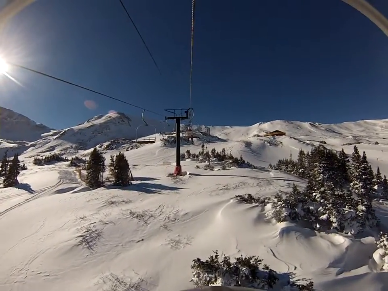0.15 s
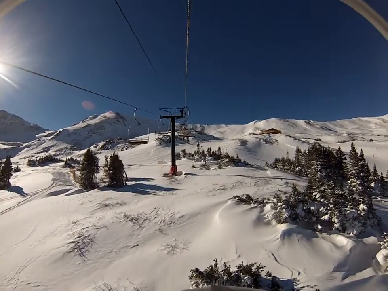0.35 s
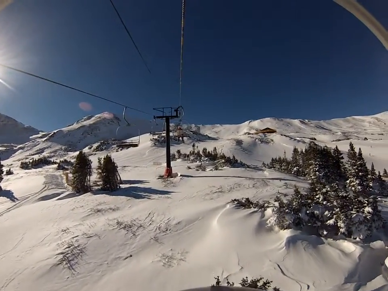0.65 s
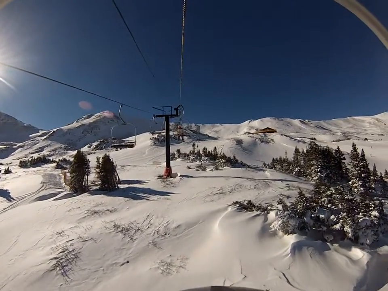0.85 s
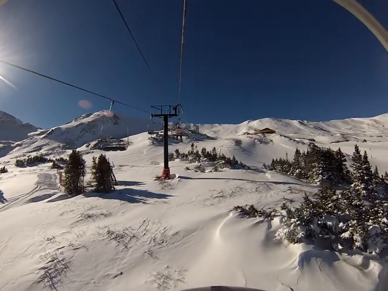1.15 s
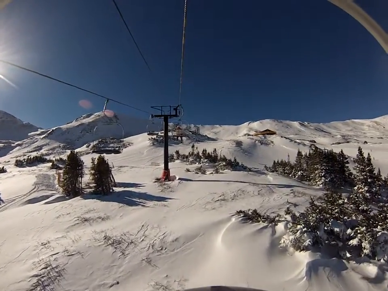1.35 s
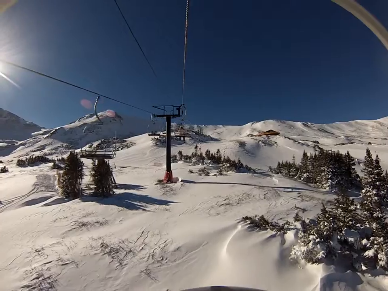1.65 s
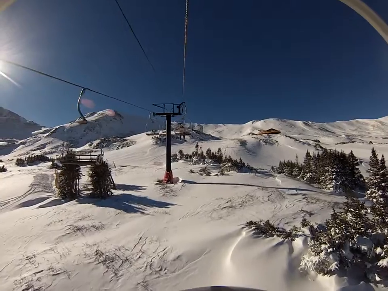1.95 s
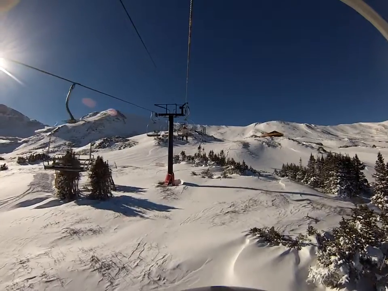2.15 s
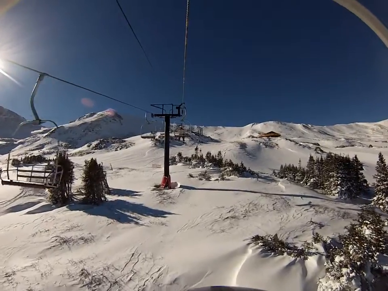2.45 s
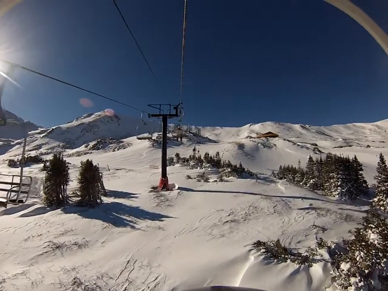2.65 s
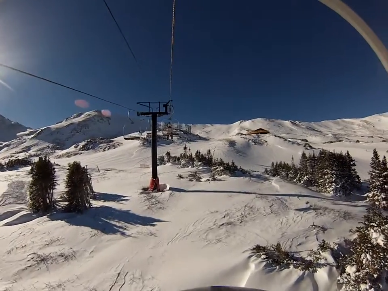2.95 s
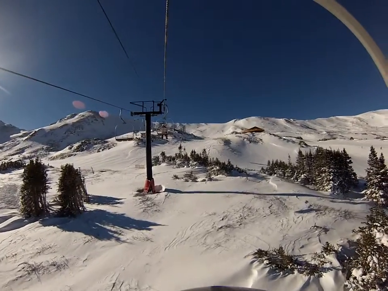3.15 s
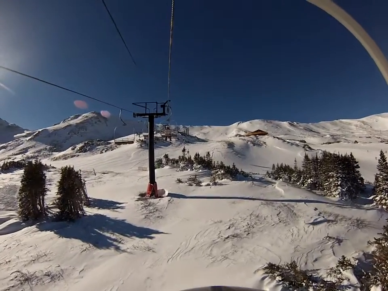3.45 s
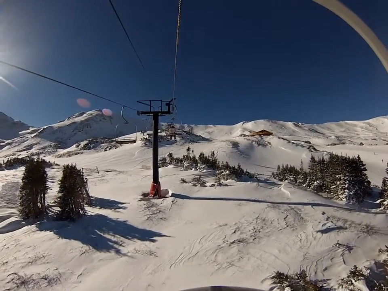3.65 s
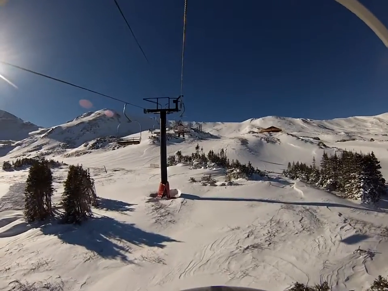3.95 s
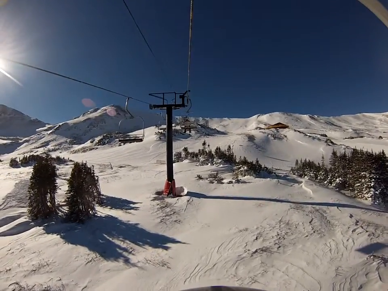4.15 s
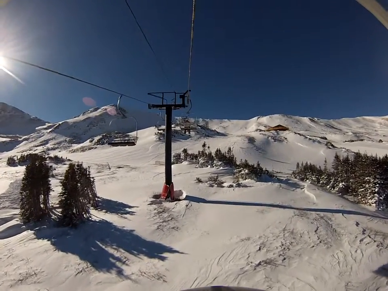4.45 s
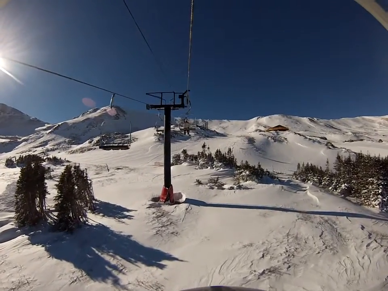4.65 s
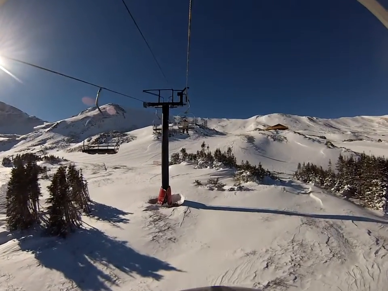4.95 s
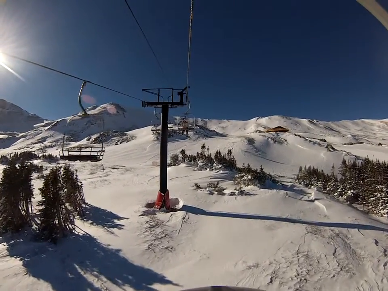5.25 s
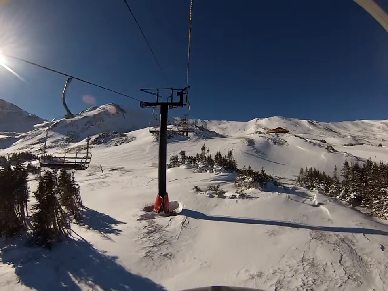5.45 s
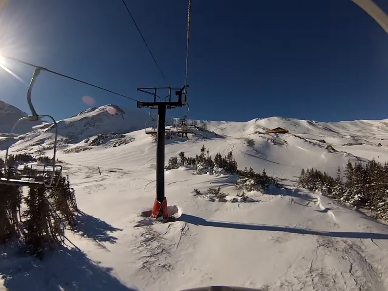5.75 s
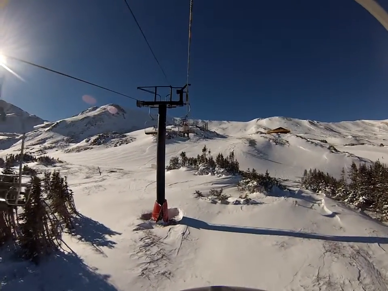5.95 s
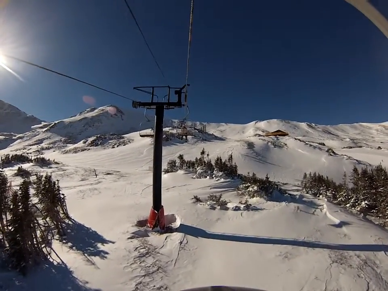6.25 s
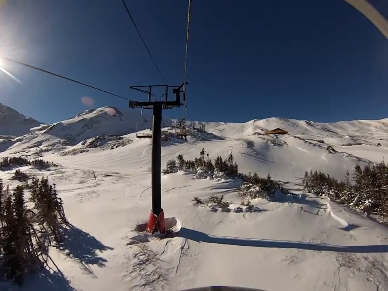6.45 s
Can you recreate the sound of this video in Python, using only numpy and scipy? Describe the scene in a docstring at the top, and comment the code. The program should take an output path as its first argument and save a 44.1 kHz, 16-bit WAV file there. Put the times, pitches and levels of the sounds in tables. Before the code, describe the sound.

A chairlift ride on an open snowy slope, heard by a microphone shut in a small camera case. Throughout, a very low cable hum wavers in pitch and strength, with rough bass rumble and steady faint hiss. At first the breeze is weak, with a soft swish near 0.4 s, a faint tick at 0.7 and small hollow booms from 0.9. A tick comes at 1.5; around 2.0 two clearer ticks and a short gritty scrape coincide as the wind rises. Fluttering booms cluster from 2.0 to 2.9, with a dull thump at 2.4 and cloth-like swishes at 2.6 and 2.8. Two thumps and a faint tick arrive near 3.2, amid stronger gusts until 3.5. Booms and swishes return at 3.8-4.1. Deep jolts at 4.2 and 4.4 start heavy shuddering that slowly fades. Further booms hit at 4.8, 5.3 and 5.6; the breeze eases, with a last brief gust at 6.6.

```python
"""A low, wavering hum and rumble, jolts and shuddering, under a gusty, booming breeze: a chairlift
nearing a tower on a snowy slope, heard inside a closed camera case. Soft swishes, a scrape and ticks.
Rope and jolts are sines of wandering pitch or decaying swing; rumble and sway are coloured noise.
The breeze is noise through the case's resonances; rubs and scrape are noise in bells of time.
Ticks are decaying sines with a noise burst. Even microphone hiss lies under it all."""
import sys
import numpy as np
from scipy import signal
from scipy.fft import rfft, irfft, next_fast_len
from scipy.io import wavfile
from scipy.ndimage import uniform_filter1d, map_coordinates

SR = 44100
rng = np.random.default_rng(int(sys.argv[2]) if len(sys.argv) > 2 else 0)


def log_audio(samples):
    """Write samples as a 16-bit WAV file to the path given in sys.argv[1]."""
    # one column per channel
    frames = np.atleast_2d(samples).T
    # limit to full scale, then quantise
    limited = np.clip(frames, -1, 1)
    pcm = np.round(limited * 32767).astype(np.int16)
    wavfile.write(sys.argv[1], SR, pcm)


N = 291942

# resonances of the case's walls: f/Hz, width/Hz, relative level/dB
WALL_MODES = [(922, 90, -3), (1271, 50, -3), (1329, 160, 7), (1535, 120, 1), (1890, 220, -7)]


def amp(db):
    """Decibels to gain."""
    return 10 ** (np.asarray(db) / 20)


def unit(x):
    """Scale to rms 1."""
    return x / np.sqrt(np.mean(x ** 2) + 1e-20)


def curve(rows):
    """Interpolate (t/s, value) rows to one value per sample."""
    t_s, values = np.transpose(rows)
    return np.interp(np.arange(N) / SR, t_s, values)


def wobble(rate_hz):
    """Smooth random curve with rate_hz knots a second."""
    knots = rng.standard_normal(int(N * rate_hz / SR) + 4)
    return map_coordinates(knots, [np.arange(N) * rate_hz / SR])


def tone(hz):
    """Sine of rms 1 that follows the pitch curve hz from a random phase."""
    return unit(np.sin(2 * np.pi * (np.cumsum(hz) / SR + rng.random())))


def filtered(x, response):
    """Apply a complex frequency response, zero-padded against wrap-around."""
    m = next_fast_len(N + SR // 2)
    return irfft(rfft(x, m) * response(np.fft.rfftfreq(m, 1 / SR)), m)[:N]


def coloured(x, points):
    """Shape x by a (f/Hz, level/dB) spectrum, at rms 1."""
    f, db = np.transpose(points)
    return unit(filtered(x, lambda hz: amp(np.interp(np.log(hz + 1), np.log(f), db))))


def resonate(x, modes):
    """Ringing of parallel band-pass resonances (f/Hz, width/Hz, level/dB) under a force x."""
    def response(f):
        return sum(amp(db) * 1j * f * width / (centre * centre - f * f + 1j * f * width)
                   for centre, width, db in modes)
    return filtered(x, response)


def turbulence(lumpy_db, rate_hz):
    """White noise whose level wanders in lumps."""
    return rng.standard_normal(N) * amp(lumpy_db * wobble(rate_hz))


def sustained(x, window_s):
    """Divide out the running rms, so strength holds steady over spans longer than window_s."""
    power = uniform_filter1d(x ** 2, int(window_s * SR))
    return x / np.sqrt(np.abs(power) + 1e-4)


def swell(peak_s, half_s, edge=2):
    """Bell of height 1 around peak_s; a higher edge steepens its sides."""
    return np.exp(-np.abs((np.arange(N) / SR - peak_s) / half_s) ** edge)


def shudder_strength():
    """Frame bouts build up as half a bell, decay exponentially and add in power to a calm trembling."""
    # bouts: peak t/s, relative level/dB, rise/s, t60/s
    shudders = [(2.0, -40.5, 0.37, 4.6), (4.57, -26.5, 0.15, 3.1), (5.3, -36, 0.35, 12)]
    calm_db = -46.5
    t = np.arange(N) / SR
    power = amp(calm_db) ** 2
    for peak_s, db, rise_s, t60_s in shudders:
        decay = amp(-60 * np.abs(t - peak_s) / t60_s)
        bout = amp(db) * np.where(t < peak_s, swell(peak_s, rise_s), decay)
        power = power + bout ** 2
    return np.sqrt(power)


def chair():
    """Rope hum and rumble come down and ring the hanger; the frame shudders at its own slow mode."""
    # rope's centre pitch: t/s, f/Hz
    hum_pitch = [(0, 49.6), (0.9, 48.8), (1.6, 49.4), (2.4, 48.8), (2.8, 50), (3.4, 48), (4.3, 50.2),
                 (5.3, 49.6), (5.7, 50.7), (6.1, 49.6), (6.6, 50.3)]
    # strength of the hum: t/s, relative level/dB
    hum_strength = [(0, -30.5), (0.12, -37.5), (0.27, -42.5), (0.42, -36), (0.55, -38), (0.67, -52),
                    (0.8, -37), (0.92, -31.5), (1.15, -55), (1.33, -40), (1.56, -33.5), (2.05, -42),
                    (2.45, -38.5), (2.85, -40), (3.2, -59), (3.42, -43), (3.75, -46.5), (4.15, -48),
                    (4.25, -31.5), (4.5, -45), (4.93, -33.5), (5.23, -44), (5.4, -39), (5.6, -32.5),
                    (5.74, -30), (5.92, -39.5), (6.08, -36.5), (6.2, -39), (6.57, -28.5)]
    # strength of the rumble: t/s, relative level/dB
    rumble_strength = [(0, -43.5), (0.35, -48), (0.7, -47.5), (0.95, -46.5), (1.5, -49), (2.0, -43),
                       (2.55, -43.5), (3.3, -46.5), (3.6, -48.5), (4.15, -42.5), (4.35, -46.5),
                       (4.75, -41.5), (5.15, -48), (5.32, -41), (5.85, -41), (6.0, -49), (6.25, -49.5),
                       (6.5, -42)]
    # hanger's rumble spectrum: f/Hz, relative density/dB per Hz
    hanger_spectrum = [(20, -16.5), (36, -13), (62, -2), (78, -3), (100, -4), (110, -9), (130, -15.5),
                       (180, -28), (300, -36), (600, -43), (1200, -46.5), (6000, -120)]
    # hanger's wavering resonances: centre f/Hz, mean relative level/dB
    hanger_modes = [(32, 0), (77, -1), (87, -4.5), (99, -3.5)]
    # loose swaying of the seat: f/Hz, relative density/dB per Hz
    seat_spectrum = [(4, -29), (12, 0), (22, -7), (34, 2), (44, -29), (70, -44), (400, -120)]
    hum_db, rumble_db, modes_db, shudder_db, sway_db = -3, -2.5, -1.0, -1.5, -5.5  # relative mix
    shudder_hz, drift_hz, throb_db = 23.04, 0.91, 2.0

    # the rope's tension keeps changing
    hum = unit(tone(curve(hum_pitch) + 1.124 * wobble(20)) * amp(throb_db * wobble(13)))

    ringing = np.zeros(N)
    for hz, db in hanger_modes:
        ringing += amp(db + 2.33 * wobble(6)) * tone(hz * (1 + 0.0249 * wobble(8)))
    rough = sustained(coloured(rng.standard_normal(N), hanger_spectrum), window_s=0.19)
    rumble = amp(modes_db) * unit(ringing) + amp(rumble_db) * rough
    rumble *= amp(2.2 * wobble(16))

    frame = tone(shudder_hz + drift_hz * wobble(4.4))
    sway = sustained(coloured(rng.standard_normal(N), seat_spectrum), window_s=0.58)
    shudder = amp(shudder_db) * frame + amp(sway_db) * sway

    out = amp(curve(hum_strength) + hum_db) * hum
    out += amp(curve(rumble_strength)) * rumble
    return out + shudder_strength() * shudder


def ringing_walls():
    """Small eddies ring each wall resonance in its own brief flutters."""
    return sum(resonate(turbulence(lumpy_db=2.0, rate_hz=22), [mode]) for mode in WALL_MODES)


def breeze():
    """Big eddies stir the hollow, smaller ones ring the walls, and gusts add a fine rush."""
    # breeze strength: t/s, level/dB
    breeze_strength = [(0, -68), (0.42, -70.5), (0.55, -68), (0.9, -67), (1.38, -73.5), (1.5, -68.5),
                       (1.86, -71), (1.98, -61), (2.12, -61.5), (2.45, -60), (2.85, -62.5), (3.15, -58.5),
                       (3.45, -57.5), (3.95, -59), (4.3, -61), (5.0, -61), (5.55, -62), (6.2, -62),
                       (6.45, -67)]
    # short gusts and lulls: peak t/s, half length/s, change/dB
    gusts = [(1.69, 0.042, 5.5), (2.23, 0.028, 3.5), (2.95, 0.054, -6), (3.25, 0.04, 5), (3.42, 0.068, 2),
             (4.26, 0.047, 6.5), (4.385, 0.051, 5), (4.65, 0.11, 3), (5.32, 0.067, 5.5), (5.5, 0.048, 4.5),
             (5.91, 0.047, -7), (6.03, 0.052, 5), (6.57, 0.063, 10)]
    # hollow of the case: f/Hz, relative density/dB per Hz
    hollow_spectrum = [(70, -33), (140, -11), (200, -10), (245, -9), (282, -1.5), (315, -11.5), (390, -23),
                       (440, -20), (500, -27.5), (750, -33), (1200, -32.5), (6000, -120)]
    # fine eddies at the case's edges: f/Hz, relative density/dB per Hz
    eddy_spectrum = [(400, 2), (900, -6.5), (1600, -9), (2000, 0.5), (2500, -4.5), (2950, -4.5),
                     (3900, -15.5), (4800, -14), (5800, -20.5), (9000, -34), (15000, -38)]
    reference_db = -60  # breeze strength at which the layer levels below apply
    buffet_db, brush_db, eddy_db = -55.0, -60.0, -65.0
    buffet_growth = 0.56  # dB per dB of breeze; the other layers grow 1:1
    gust_in_hollow, gust_on_walls = 0.34, 0.59  # dB per dB of gust; 1 for the fine eddies
    gust_edge = 4.4  # gusts set in and stop more abruptly than a plain bell (2)

    strength = curve(breeze_strength) - reference_db
    gust = sum(db * swell(peak_s, half_s, gust_edge) for peak_s, half_s, db in gusts)

    buffet = coloured(turbulence(lumpy_db=0.5, rate_hz=33), hollow_spectrum)
    buffet = sustained(buffet, window_s=0.19)
    # the walls pass little outside their resonances
    wall_spectrum = [(300, -34.0), (900, 1.0), (2000, 0.5), (4000, -11.0), (10000, -26)]
    brush = coloured(sustained(unit(ringing_walls()), window_s=0.14), wall_spectrum)
    eddies = coloured(turbulence(lumpy_db=1.5, rate_hz=170), eddy_spectrum)

    upper = amp(brush_db + strength + gust_on_walls * gust) * brush
    upper += amp(eddy_db + strength + gust) * eddies
    flutter = amp(1.08 * wobble(35))  # the same air drives both upper layers
    lower = amp(buffet_db + buffet_growth * strength + gust_in_hollow * gust) * buffet
    return lower + flutter * upper


def hiss():
    """The microphone's own even noise."""
    # f/Hz, relative density/dB per Hz
    hiss_spectrum = [(100, 0.5), (600, 8), (1500, 1), (3000, 4.5), (5000, 3), (7500, 2), (9700, 0),
                     (11000, 1), (13000, -2.5), (15300, -7.5)]
    level_db = -71
    return amp(level_db) * coloured(rng.standard_normal(N), hiss_spectrum)


def swishes():
    """Cloth-like rubs swell and fade, hissing in the seat's bands and sounding the case's walls."""
    # rubs: peak t/s, half length/s, hiss level/dB, wall level/dB, hiss centre f/Hz
    rubs = [(0.384, 0.093, -80, -62.5, 4500), (2.6, 0.069, -74, -56, 5200),
            (2.792, 0.073, -71.5, -56, 5300), (3.854, 0.062, -74, -58.5, 4900),
            (4.059, 0.036, -63.5, -58, 4270)]
    # bands in which the rubbed seat rings: f/Hz, width/Hz, relative level/dB
    rub_bands = [(2750, 280, 7.5), (3450, 240, 3), (4410, 220, 0.5), (4890, 340, 1), (5600, 280, -5)]
    # hiss before its shift in pitch: f/Hz, relative density/dB per Hz
    cloth_spectrum = [(1800, -9), (3100, -4.5), (4500, 4.5), (6000, -11), (9000, -13)]
    # part that the walls take up: f/Hz, relative density/dB per Hz
    body_spectrum = [(700, -36), (1050, -1.5), (1170, -2.5), (1240, 2.5), (1320, -11), (1600, -4.5),
                     (2600, -19)]
    cloth_hz = 4560  # unshifted centre; a faster rub shifts it up

    seat = resonate(turbulence(lumpy_db=1.5, rate_hz=180), rub_bands)
    body = coloured(resonate(rng.standard_normal(N), WALL_MODES), body_spectrum)
    out = np.zeros(N)
    for peak_s, half_s, hiss_db, body_db, hz in rubs:
        rub = coloured(seat, [(f * hz / cloth_hz, db) for f, db in cloth_spectrum])
        out += swell(peak_s, half_s) * (amp(hiss_db) * rub + amp(body_db) * body)
    return out


def ticks():
    """Each contact is a short, soft scrape that rings a fitting, at new mode strengths every time."""
    # small contacts on the chair: t/s, peak level/dB
    contacts = [(0.657, -56), (1.547, -49.5), (1.996, -45.5), (2.032, -51), (3.223, -56)]
    # ring of the struck fitting: f/Hz, mean relative level/dB, t60/s
    fitting_modes = [(970, 0.5, 0.035), (1403, -1, 0.08), (1710, 3, 0.035), (2303, 0.5, 0.04),
                     (2470, -2, 0.034), (3430, -6.5, 0.03), (4980, -7, 0.035)]
    scrape_t60_s, build_up_s, soft_hz = 0.025, 0.00027, 3400
    lowpass = signal.butter(2, soft_hz, fs=SR)
    out = np.zeros(N)
    t = np.arange(SR // 2) / SR
    for start_s, peak_db in contacts:
        ring = np.zeros(len(t))
        for hz, db, t60_s in fitting_modes:
            decay = amp(db + 2 * rng.standard_normal() - 60 * t / t60_s)
            ring += decay * np.sin(2 * np.pi * hz * t)
        scrape = rng.standard_normal(len(t)) * amp(-60 * t / scrape_t60_s)
        tick = (ring + scrape) * (1 - np.exp(-t / build_up_s))  # the contact builds up softly
        tick = signal.lfilter(*lowpass, tick)
        out[round(start_s * SR):][:len(t)] += amp(peak_db) * tick / np.abs(tick).max()
    return out


def booms():
    """Big eddies blow the hollow's main resonance: rough, fluttering surges of unsteady, rising pitch."""
    # eddies: start t/s, length/s, level before flutter/dB, mid pitch f/Hz
    big_eddies = [(0.933, 0.058, -57, 279.5), (1.52, 0.035, -60, 280), (1.647, 0.087, -58, 272.4),
                  (1.955, 0.1, -51.5, 282), (2.2, 0.11, -52, 282.3), (2.399, 0.075, -45.5, 288),
                  (2.492, 0.19, -51, 286.2), (2.714, 0.19, -55.5, 279.7), (3.209, 0.098, -48, 268),
                  (3.328, 0.092, -50.5, 280), (3.421, 0.08, -47, 276), (3.76, 0.08, -47.5, 280),
                  (3.844, 0.18, -53, 268), (4.815, 0.071, -47, 278), (5.347, 0.073, -44.5, 278),
                  (5.641, 0.082, -51, 281.3)]
    # main resonance of the hollow: f/Hz, relative density/dB per Hz
    boom_spectrum = [(120, -15), (205, -15), (240, -2.5), (280, 8), (318, -6.5), (355, -20.5), (430, -23),
                     (520, -40), (900, -56)]
    attack_s, release_s = 0.018, 0.066
    rise_hz, waver_hz = 30, 17  # the pitch climbs while an eddy lasts
    tone_share = 0.47  # of the power; the rest is noise
    flutter_db = 1.0

    rough = sustained(coloured(rng.standard_normal(N), boom_spectrum), window_s=0.056)
    waver = waver_hz * wobble(55)
    out = np.zeros(N)
    for start_s, length_s, db, hz in big_eddies:
        t = np.arange(N) / SR - start_s
        attack = np.clip(t / attack_s, 0, 1)
        release = np.clip((length_s - t) / release_s + 0.5, 0, 1)  # half way down at length_s
        pitch = hz + rise_hz * (np.clip(t / length_s, 0, 1) - 0.5) + waver
        surge = np.sqrt(tone_share) * tone(pitch) + np.sqrt(1 - tone_share) * rough
        out += amp(db) * attack * release * sustained(surge, window_s=0.036)
    return out * amp(flutter_db * wobble(55))


def scrapes():
    """Something drags across the seat for a moment, catching and slipping in rough grains of noise."""
    # drags: peak t/s, half length/s, level/dB
    drags = [(2.036, 0.033, -50.3)]
    # colour: f/Hz, relative density/dB per Hz
    scrape_spectrum = [(150, 10), (300, 10), (450, 4), (750, -2), (1000, -9), (1350, 10), (1650, -3),
                       (1950, 5.5), (2400, -12.5), (2900, -3.5), (3900, -21.5), (5000, -16), (9000, -37)]
    edge = 3.2
    grains = coloured(turbulence(lumpy_db=1.5, rate_hz=500), scrape_spectrum)
    return grains * sum(amp(db) * swell(peak_s, half_s, edge) for peak_s, half_s, db in drags)


def jolts():
    """Jolts down the hanger set the chair swinging for a few cycles: dull, separate thumps."""
    # t/s, peak envelope/dB, f/Hz
    thumps = [(2.43, -39, 83), (3.166, -40, 87.5), (3.246, -39, 96), (4.19, -28.5, 37.7),
              (4.375, -22, 22.7)]
    rise_cycles, t60_cycles = 0.38, 14.6
    out = np.zeros(N)
    for start_s, db, hz in thumps:
        cycles = np.maximum(np.arange(N) / SR - start_s, 0) * hz
        envelope = (1 - np.exp(-cycles / rise_cycles)) * amp(-60 * cycles / t60_cycles)
        out += amp(db) * envelope / envelope.max() * np.sin(2 * np.pi * cycles)
    return out


def scene():
    """Sum all sources at one microphone inside the case."""
    steady = chair() + breeze() + hiss()
    events = swishes() + ticks() + booms() + scrapes() + jolts()
    return (steady + events)[None]


def record(dry):
    """The camera keeps nothing above its band limit."""
    band_limit_hz = 15350
    return filtered(dry[0], lambda hz: hz < band_limit_hz)[None]


dry = scene()
out = record(dry)
log_audio(out)
```